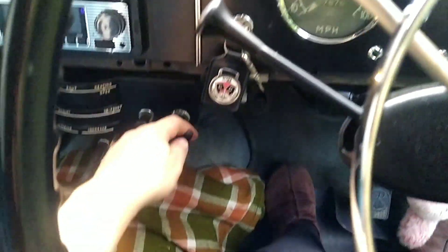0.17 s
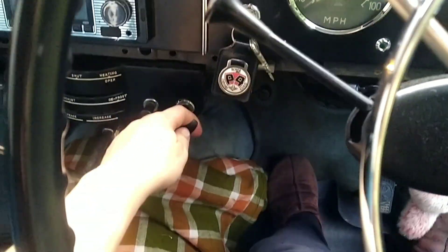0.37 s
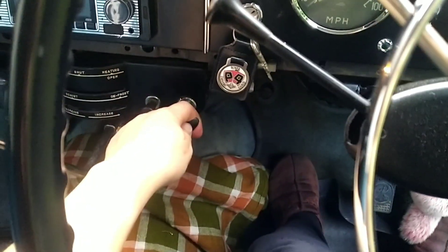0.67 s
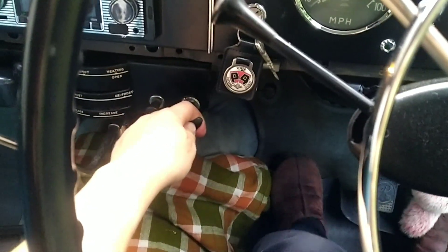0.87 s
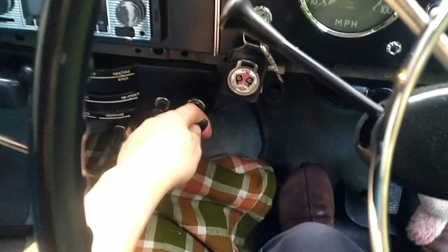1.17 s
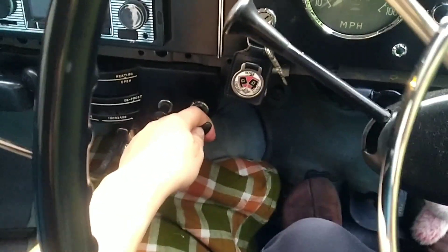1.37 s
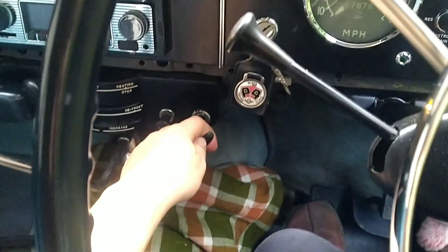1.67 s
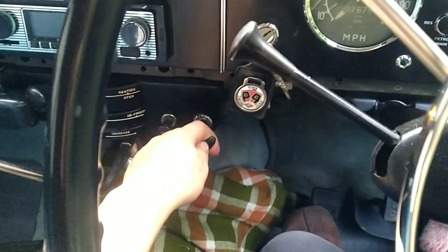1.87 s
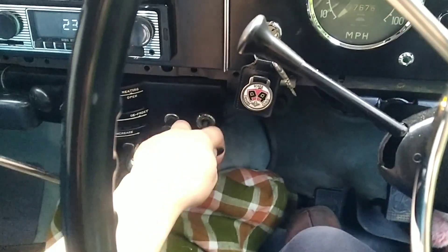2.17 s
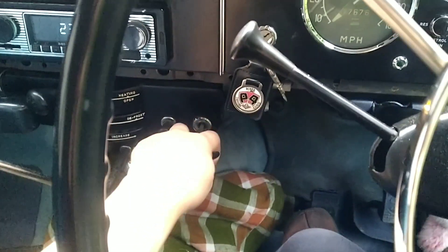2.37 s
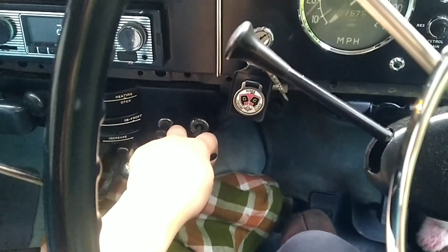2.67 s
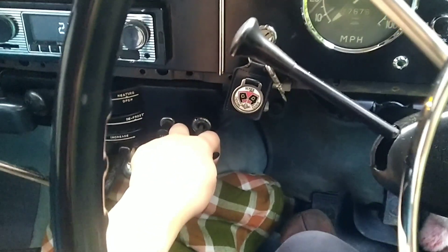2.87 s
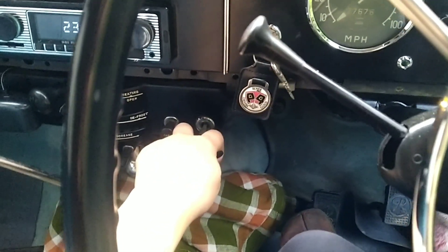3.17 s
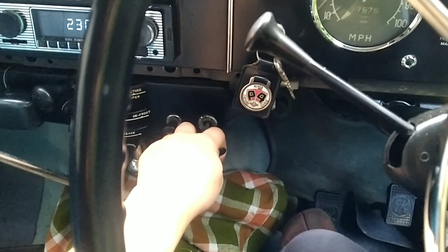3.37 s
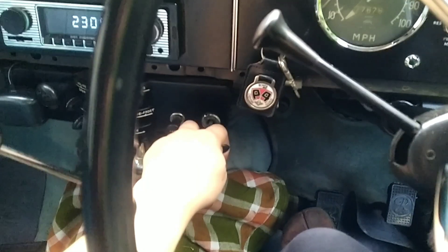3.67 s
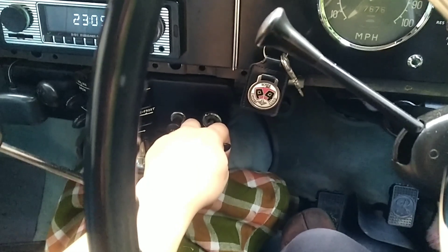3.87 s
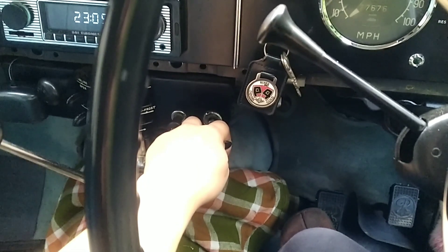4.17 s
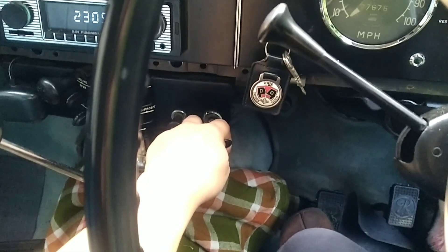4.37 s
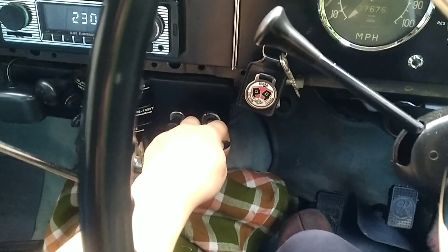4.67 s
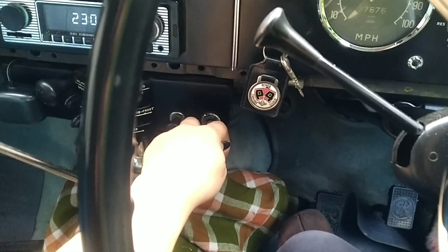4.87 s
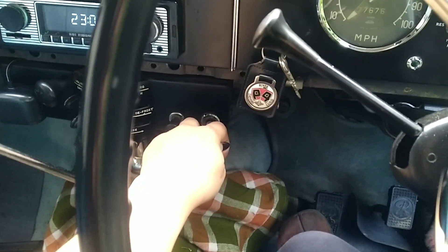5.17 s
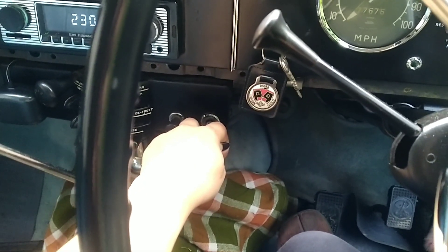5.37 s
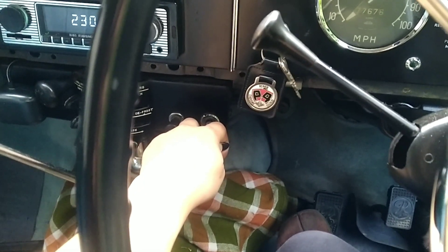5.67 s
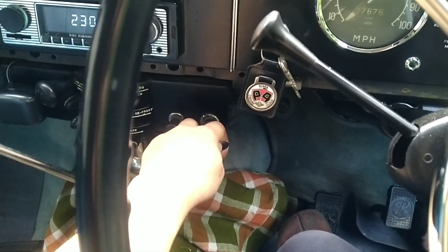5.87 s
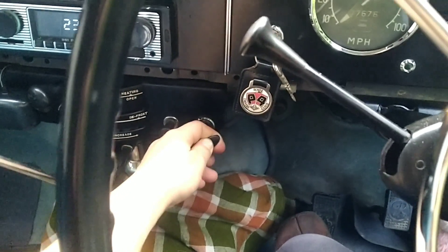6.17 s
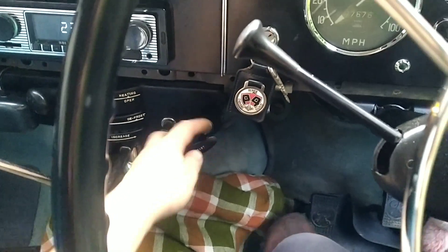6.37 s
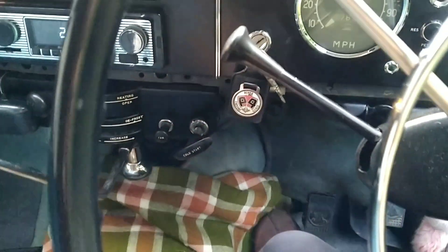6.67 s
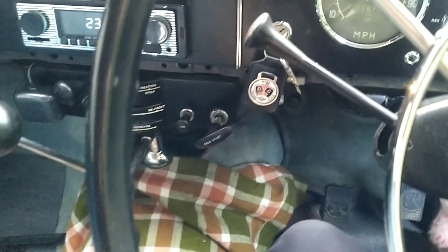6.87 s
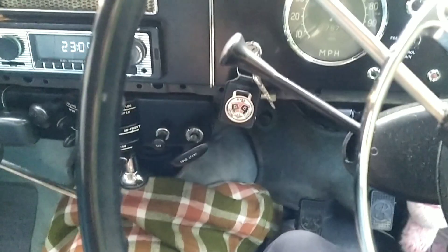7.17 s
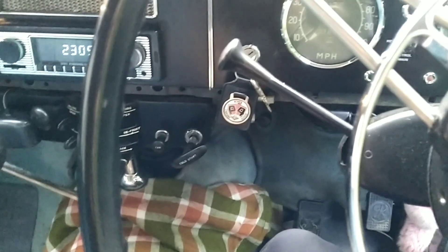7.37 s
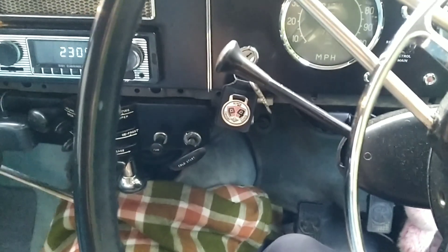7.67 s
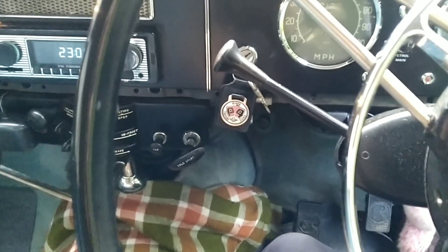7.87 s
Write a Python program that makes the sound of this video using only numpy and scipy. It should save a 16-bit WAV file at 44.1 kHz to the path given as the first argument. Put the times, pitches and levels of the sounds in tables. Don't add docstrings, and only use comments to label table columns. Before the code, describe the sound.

Heard from the driver's seat of an old saloon, a six-cylinder engine runs at a steady fast idle, deep and booming, with rushing intake air and metallic valve clatter. A hard knock and dull thumps come early. Midway the engine drops to a slower, softer idle; small microphone clicks follow, and a sudden throttle blip ends it.

```python
import sys
import numpy as np
from scipy import signal
from scipy.fft import rfft, irfft, next_fast_len
from scipy.io import wavfile
from scipy.ndimage import map_coordinates

SR = 44100
rng = np.random.default_rng(int(sys.argv[2]) if len(sys.argv) > 2 else 0)


def level_to_linear(level):
    exponent = np.asarray(level, float) / 20
    return 10 ** exponent


def transcribe(signal):
    frames = np.atleast_2d(signal).T
    limited = np.clip(frames, -1, 1)
    pcm = np.round(limited * 32767).astype(np.int16)
    wavfile.write(sys.argv[1], SR, pcm)


N = 352932


def unit(x):
    return x / np.sqrt(np.mean(x ** 2) + 1e-20)


def curves(rows):
    start_s, *columns = np.transpose(rows)
    time_s = np.arange(N) / SR
    return [np.interp(time_s, start_s, column) for column in columns]


def wobble(rate_hz):
    knots = rng.standard_normal(int(N * rate_hz / SR) + 4)
    return map_coordinates(knots, [np.arange(N) * rate_hz / SR])


def filtered(x, response):
    size = next_fast_len(len(x) + SR // 2)
    spectrum = rfft(x, size) * response(np.fft.rfftfreq(size, 1 / SR))
    return irfft(spectrum, size)[:len(x)]


def noise(spectrum, size):
    hz, db = np.transpose(spectrum)

    def colour(f):
        return level_to_linear(np.interp(np.log(f + 1), np.log(hz), db))

    return unit(filtered(rng.standard_normal(size), colour))


def resonance(f, centre_hz, width_hz):
    damping = 1j * f * width_hz
    return damping / (centre_hz * centre_hz - f * f + damping)


# centre_hz [Hz], width_hz [Hz], level_db [dB]
CABIN_MODES = [(110, 24, 0), (134, 20, -14), (204, 14, 0), (298, 16, -14)]
# centre_hz [Hz], width_hz [Hz], level_db [dB]
PANEL_PATH = (250, 500, -26)


def cabin(f):
    booms = sum(level_to_linear(level_db) * resonance(f, hz, width_hz) ** 2 for hz, width_hz, level_db in CABIN_MODES)
    panel_hz, panel_width_hz, panel_db = PANEL_PATH
    return booms - level_to_linear(panel_db) * resonance(f, panel_hz, panel_width_hz)


# pitch_hz [Hz], level_db [dB per Hz]
VALVE_GEAR = [(150, -17), (300, -2.5), (480, -6.5), (720, -12), (820, -23), (1000, -17.5), (1280, -24),
              (1700, -25.5), (2250, -27.5), (2700, -28.5), (3200, -34), (3700, -30), (3950, -49.5),
              (9000, -77.5)]
# centre_hz [Hz], width_hz [Hz], level_db [dB]
DASH_MODES = [(926, 39, -0.5), (1110, 90, -3), (1400, 69, -4.5), (1530, 50, -3.5), (1890, 160, 0),
              (1990, 50, 1.5), (2844, 50, -0.5), (3450, 140, -6.5), (4040, 120, 10)]
# pitch_hz [Hz], level_db [dB per Hz]
INTAKE_ROAR = [(150, -16), (300, 0.5), (600, -11.5), (1000, -12.5), (2000, -20.5), (3000, -27.5),
               (3900, -27.5), (4500, -40), (5200, -37.5), (7500, -37), (8500, -51.5)]


def rush(cycles, roar_db):
    turn = 2 * np.pi * cycles
    puff = 1 + 0.12 * np.cos(6 * turn) + 0.08 * np.cos(turn + 1.5) + 0.06 * np.cos(2 * turn)

    def dash(f):
        return 1 + sum(level_to_linear(level_db) * resonance(f, hz, width_hz) for hz, width_hz, level_db in DASH_MODES)

    gear = level_to_linear(-43.5 + 0.5 * wobble(9)) * unit(filtered(noise(VALVE_GEAR, size=N), dash))
    roar = level_to_linear(roar_db + 0.5 * wobble(4.7)) * noise(INTAKE_ROAR, size=N)
    low_noise = noise([(20, -6.5), (45, 5), (70, -0.5), (150, -2.5), (400, -13.5), (800, -63)], size=N)
    shake = level_to_linear(-37.5 + 0.27 * (roar_db + 49.5)) * unit(filtered(low_noise, cabin))
    return puff * (gear + roar) + shake


# pitch_hz [Hz], level_db [dB per Hz]
BRIGHT_TICK = [(800, -50.5), (1500, -0.5), (2900, 2.5), (3700, -1.5), (4700, 1.5), (5800, -12), (7000, -9),
               (8500, -28.5)]
# pitch_hz [Hz], level_db [dB per Hz]
DULL_RATTLE = [(200, -4), (500, 4.5), (1100, 2.5), (2000, -15.5), (4000, -41.5)]
# start_s [s], peak_db [dB], dull_db [dB], thump_db [dB], t60_s [s]
KNOCK_EVENTS = [
    (.6294, -48, -4, 3, .03),
    (0.8772, -30, -2, 26, 0.14),
    (0.8987, -37, 9, 7, 0.24),
    (1.4411, -47.5, 13.5, 28, .1),
    (1.456, -46, 15, 26, 0.071),
    (1.5175, -46, 2, 12, 0.015),
    (2.637, -44, -4, 10, .02),
    (6.917, -59.5, 2, 5, .04),
]


def knocks():
    out = np.zeros(N + SR)
    t = np.arange(SR // 3) / SR
    for start_s, peak_db, dull_db, thump_db, t60_s in KNOCK_EVENTS:
        tick_decay = level_to_linear(-60 * t / 0.03) + 0.42 * level_to_linear(-60 * t / t60_s)
        tick = noise(BRIGHT_TICK, size=len(t)) * tick_decay * (1 - np.exp(-t / 0.0015))
        rattle_decay = level_to_linear(dull_db - 60 * t / (1.3 * t60_s))
        rattle = noise(DULL_RATTLE, size=len(t)) * rattle_decay * (1 - np.exp(-t / 0.0034))
        thump_decay = level_to_linear(thump_db - 60 * t / 0.22)
        thump = thump_decay * np.sin(2 * np.pi * 98 * t + 2.4) * (1 - np.exp(-t / 0.0063))
        out[round(start_s * SR):][:len(t)] += level_to_linear(peak_db - 5) * (tick + rattle + thump)
    return out[:N]


# order [per cycle], fast_db [dB at fast idle], slow_db [dB at slow idle]
ENGINE_ORDERS = [(6, -7, -7.5), (8, -19.5, -23), (9, -33, -32.5), (10, -31.5, -21.5), (11, -34.5, -33.5),
                 (12, -13, -11), (13, -42, -31.5), (14, -29, -35.5), (15, -32.5, -37), (16, -47, -44),
                 (18, -27.5, -19.5), (20, -49, -38), (21, -35, -51), (22, -30, -54), (23, -30, -57.5),
                 (24, -17, -21.5), (25, -44.5, -45.5), (26, -33, -18.5), (27, -39, -32), (28, -35.5, -38),
                 (30, -20, -32), (32, -30, -38), (34, -40, -53.5), (36, -21, -29), (38, -29, -53.5),
                 (40, -29.5, -27), (41, -38.5, -36), (42, -29, -32), (44, -37, -40.5), (48, -28.5, -43.5),
                 (50, -34, -33), (54, -23, -36.5), (60, -25, -36.5), (65.6, -29, -55)]


def engine(cycles, fast, load_db):
    phases = rng.uniform(0, 2 * np.pi, 70)
    phases[24] = 2 * phases[12] + 2.26
    sway = np.array([wobble(5.6) for _ in range(7)])
    tone = np.zeros(N)
    for order, fast_db, slow_db in ENGINE_ORDERS:
        k = round(order)
        sway_db = 0.5 if k % 6 == 0 else 2.5
        level_db = slow_db + fast * (fast_db - slow_db) + sway_db * sway[k % 7]
        tone += level_to_linear(level_db) * np.cos(2 * np.pi * k * cycles + phases[k])
    firing = np.arange(1, int(cycles[-1] * 6))
    at = np.interp(firing, cycles * 6, np.arange(N)).astype(int)
    strength = level_to_linear(-40) * rng.standard_normal(len(firing))
    blows = np.bincount(at, strength, N)
    gap = SR / 50
    return filtered(level_to_linear(load_db) * (np.sqrt(2) * tone + gap * blows), cabin)


# start_s [s], pitch_hz [four-stroke cycles per second]
ENGINE_SPEED = [(0.0, 9.116), (0.15, 9.103), (0.3, 9.093), (0.45, 8.997), (0.6, 8.863), (0.75, 8.993),
                (0.9, 9.133), (1.05, 9.166), (1.2, 9.143), (1.35, 9.172), (1.5, 9.117), (1.65, 9.144),
                (1.8, 9.141), (1.95, 9.139), (2.1, 9.171), (2.25, 9.165), (2.4, 9.148), (2.55, 9.088),
                (2.7, 9.036), (2.85, 9.067), (3.0, 9.172), (3.15, 9.174), (3.3, 9.108), (3.45, 8.988),
                (3.6, 8.683), (3.75, 8.487), (3.9, 8.217), (4.05, 7.761), (4.2, 7.649), (4.35, 7.51),
                (4.5, 7.424), (4.65, 7.377), (4.8, 7.356), (4.95, 7.331), (5.1, 7.295), (5.25, 7.268),
                (5.4, 7.234), (5.55, 7.203), (5.7, 7.206), (5.85, 7.231), (6.0, 7.272), (6.15, 7.333),
                (6.3, 7.367), (6.45, 7.367), (6.6, 7.355), (6.75, 7.338), (6.9, 7.331), (7.05, 7.344),
                (7.2, 7.38), (7.35, 7.414), (7.5, 7.444), (7.65, 7.484), (7.75, 7.55), (7.8, 7.7),
                (7.84, 7.95), (7.87, 8.2), (7.9, 8.426), (7.93, 8.823), (7.96, 9.673), (7.98, 10.06),
                (8.0, 10.318)]
# start_s [s], load_db [dB], roar_db [dB]
THROTTLE = [(0, -2.5, -41), (.6, -3, -42.5), (1.5, -3, -42), (2.5, -2.5, -44), (3.4, -3, -43.5),
            (3.7, -1.5, -47.5), (3.9, -2.5, -47.5), (4.05, -3, -60), (4.3, -5.5, -57), (5, -3.5, -52),
            (5.5, -3.5, -59.5), (6, -5, -64), (6.5, -4.5, -66), (7, -5, -56), (7.5, -5, -62),
            (7.8, -4.5, -54.5), (7.87, 0, -45), (7.93, -1, -39.5), (7.97, 2.5, -37.5), (8, -1.5, -36.5)]


def scene():
    speed, = curves(ENGINE_SPEED)
    load_db, roar_db = curves(THROTTLE)
    cycles = np.cumsum(speed) / SR
    fast = np.clip((speed - 7.4) / 1.1, 0, 1)
    return (rush(cycles, roar_db) + knocks() + engine(cycles, fast, load_db))[None]


# pitch_hz [Hz], level_db [dB per Hz]
MIC_HISS = [(3000, -28), (4450, -11), (4800, -8.5), (5000, -4), (5200, -4.5), (5900, -6), (6400, -3),
            (7550, -1.5), (7750, -7.5), (7950, -17), (8200, -24), (8600, -42.5)]
# start_s [s], step_height [full scale]
MIC_SLIPS = [
    (5.0281, 0.0036),
    (5.1643, -0.036),
    (5.3373, 0.026),
]


def microphone(sound):
    steps = np.zeros(N)
    for start_s, step_height in MIC_SLIPS:
        steps[round(start_s * SR)] = step_height
    relax_s = 0.0065
    steps = signal.lfilter([1], [1, -np.exp(-1 / (relax_s * SR))], steps)
    hiss = level_to_linear(-64 + 0.77 * wobble(11)) * noise(MIC_HISS, size=N)
    return filtered(sound + steps + hiss, lambda f: 1 / (1 + (f / 8450) ** 40))


def top_cut(x):
    return signal.sosfilt(signal.butter(12, 8910, fs=SR, output="sos"), x)


def record(dry):
    mix = microphone(dry[0])[None]
    return top_cut(mix)


dry = scene()
out = record(dry)
transcribe(out)
```